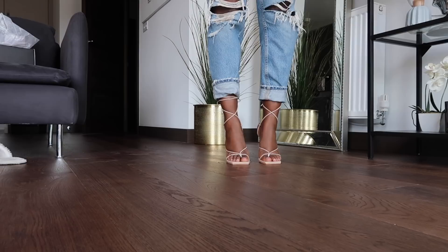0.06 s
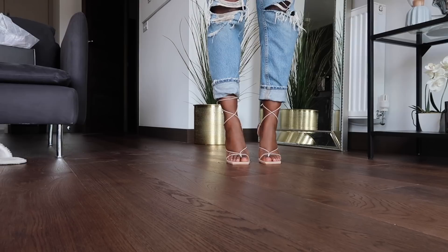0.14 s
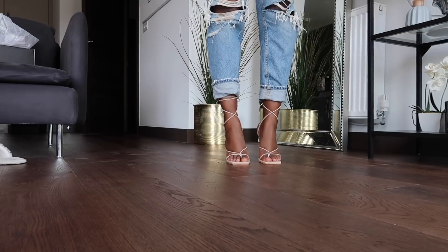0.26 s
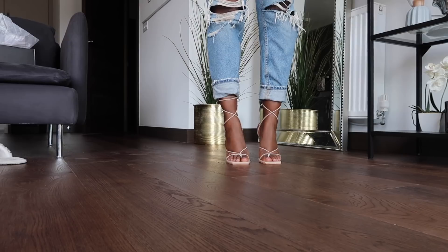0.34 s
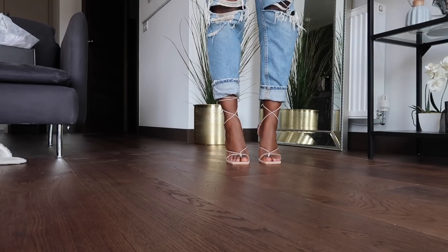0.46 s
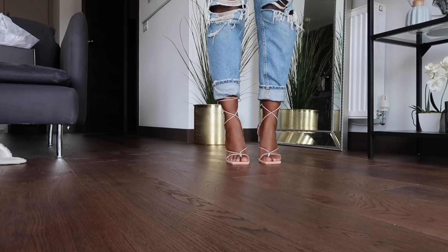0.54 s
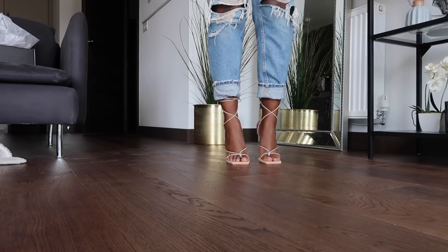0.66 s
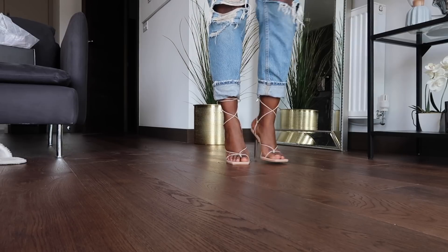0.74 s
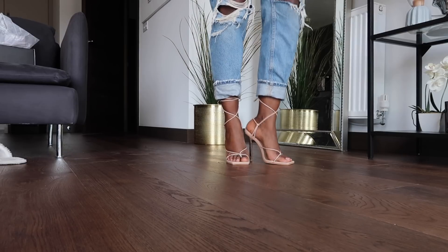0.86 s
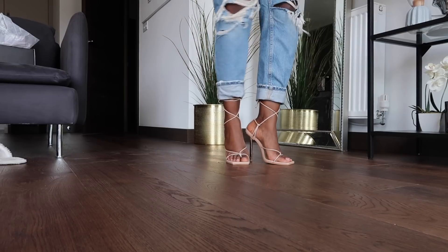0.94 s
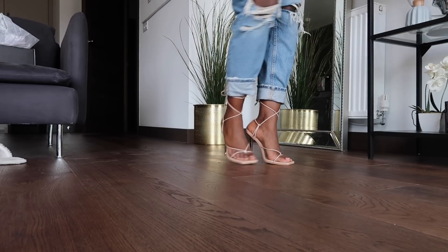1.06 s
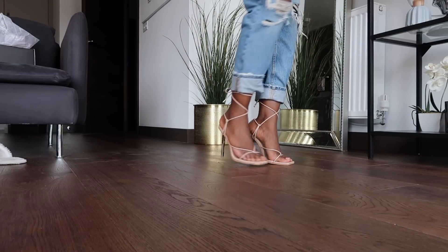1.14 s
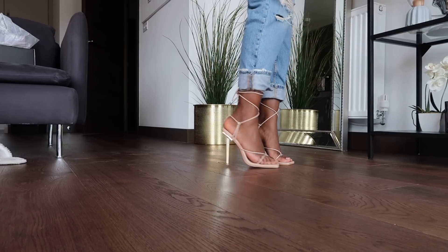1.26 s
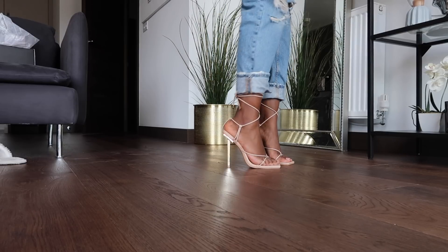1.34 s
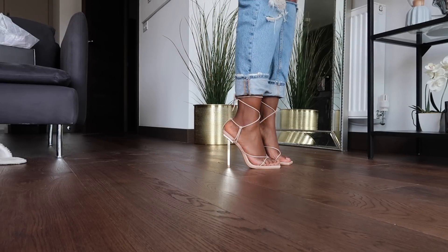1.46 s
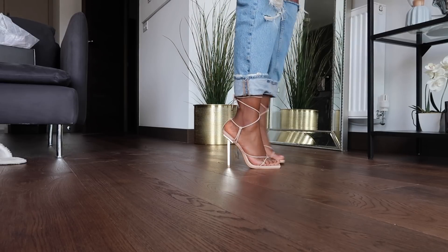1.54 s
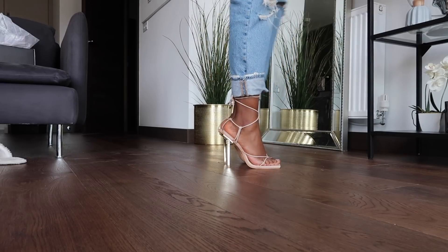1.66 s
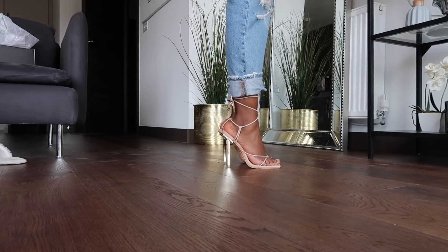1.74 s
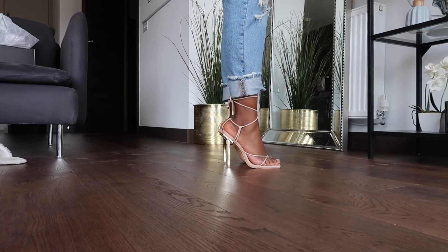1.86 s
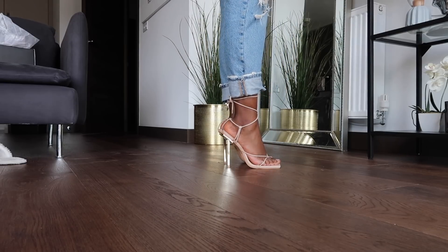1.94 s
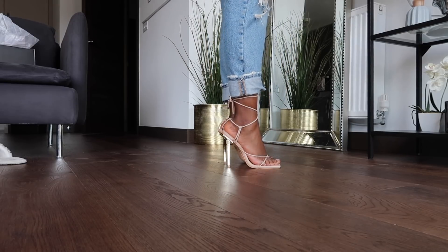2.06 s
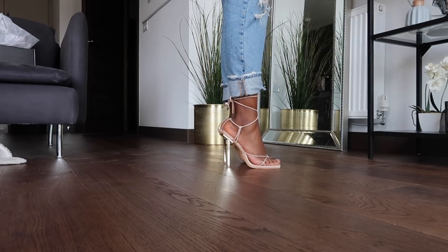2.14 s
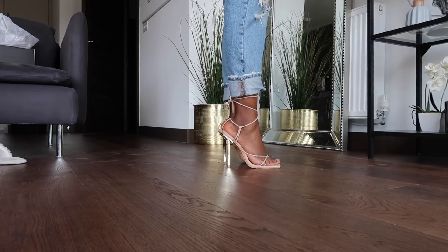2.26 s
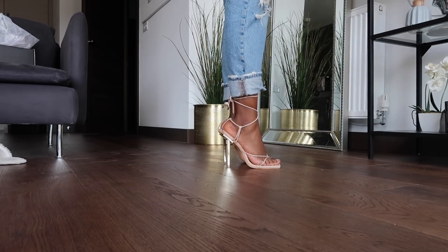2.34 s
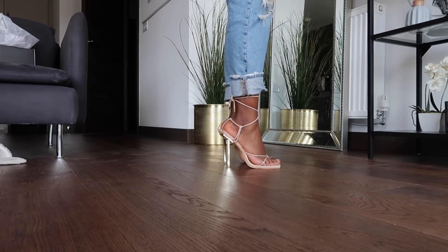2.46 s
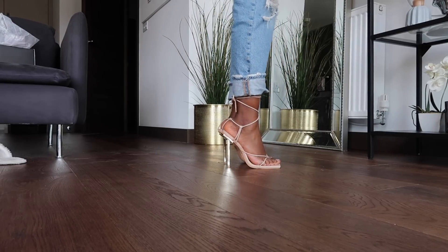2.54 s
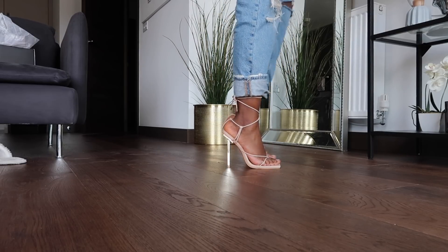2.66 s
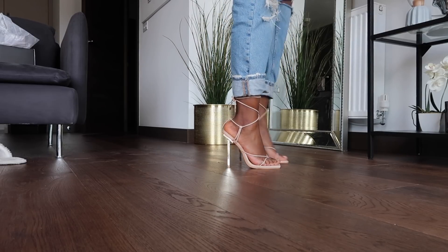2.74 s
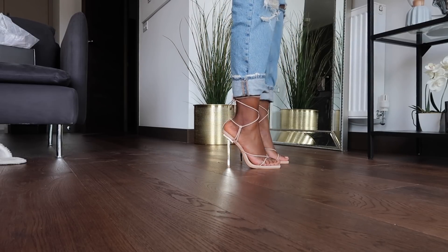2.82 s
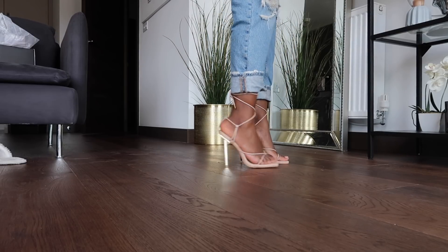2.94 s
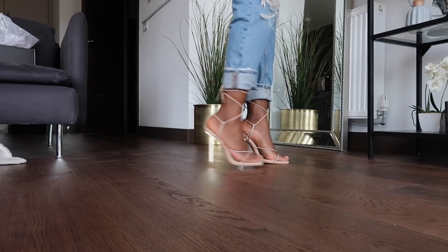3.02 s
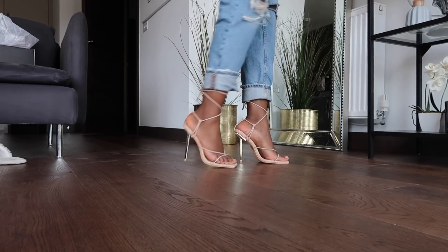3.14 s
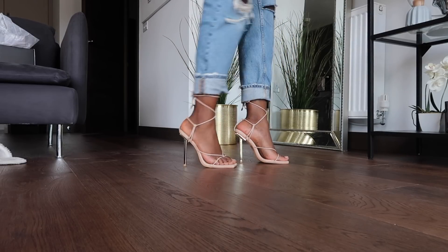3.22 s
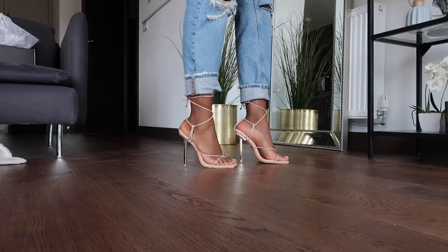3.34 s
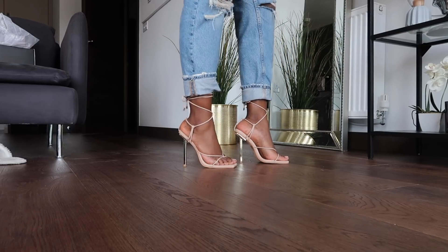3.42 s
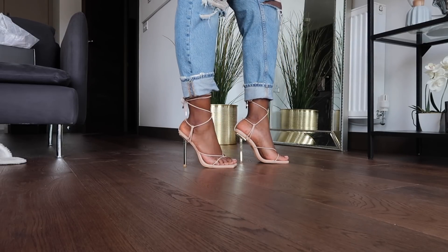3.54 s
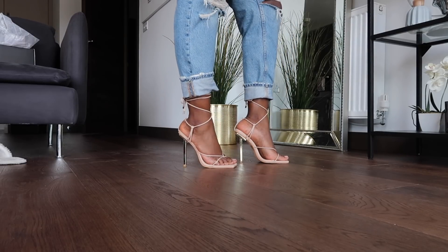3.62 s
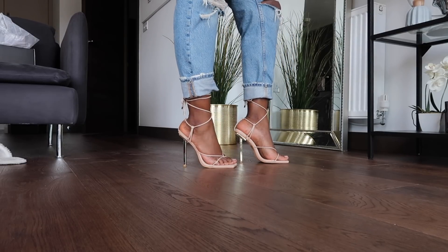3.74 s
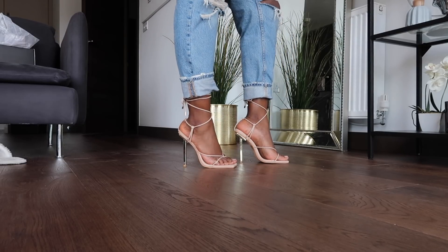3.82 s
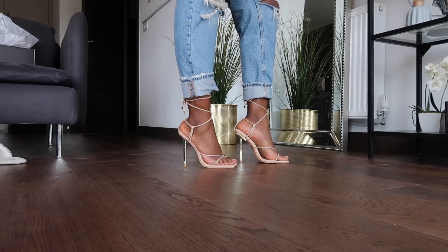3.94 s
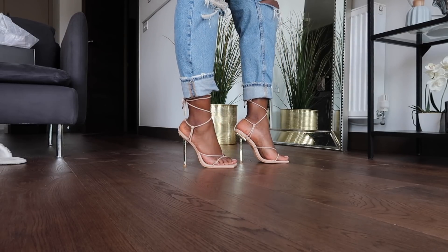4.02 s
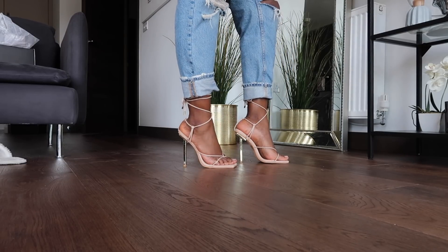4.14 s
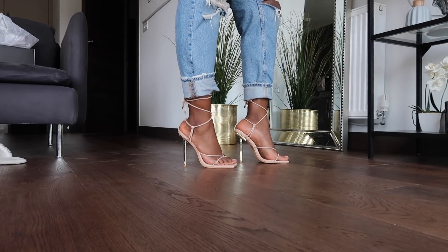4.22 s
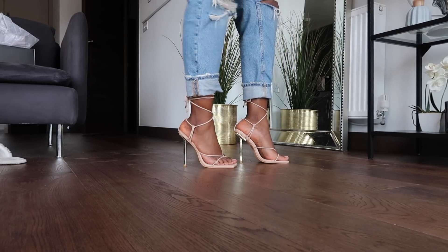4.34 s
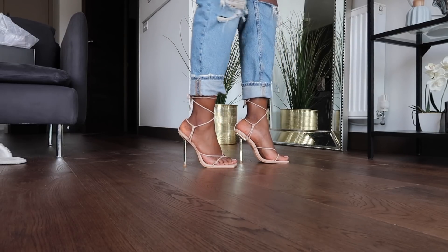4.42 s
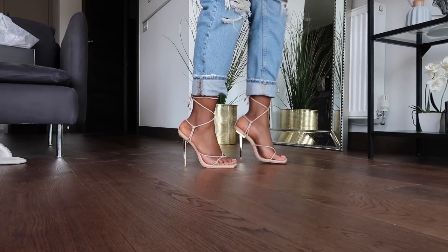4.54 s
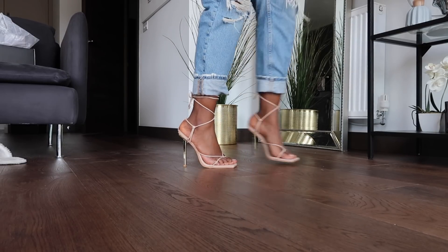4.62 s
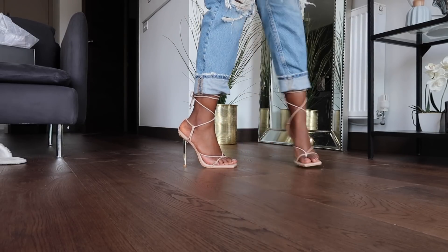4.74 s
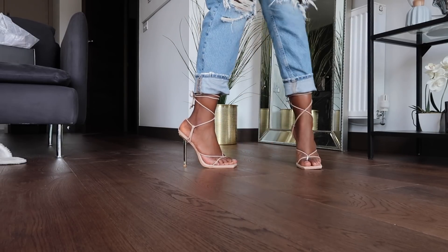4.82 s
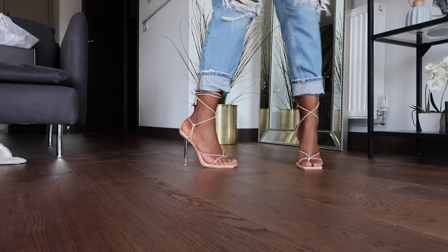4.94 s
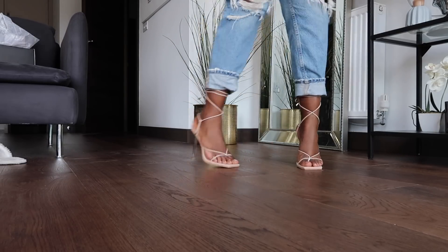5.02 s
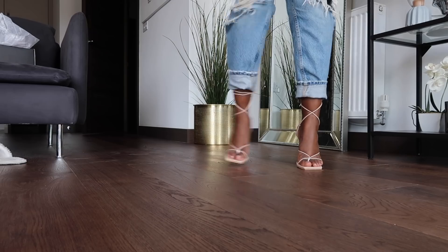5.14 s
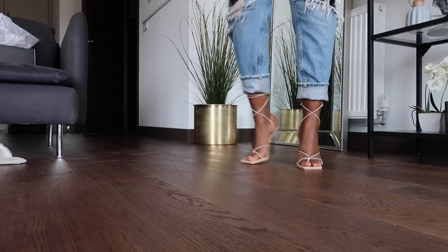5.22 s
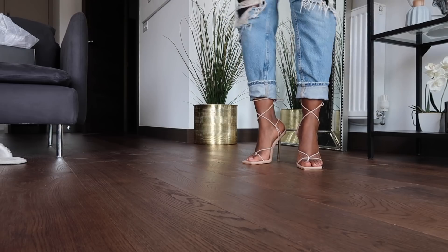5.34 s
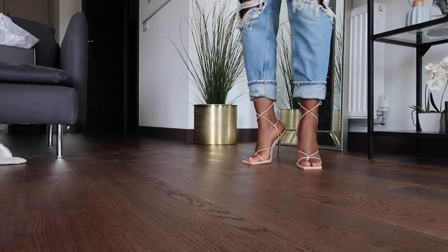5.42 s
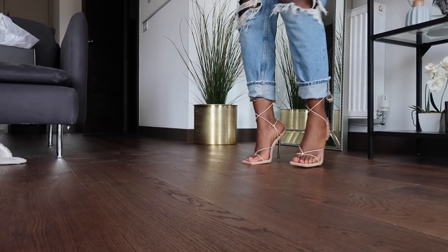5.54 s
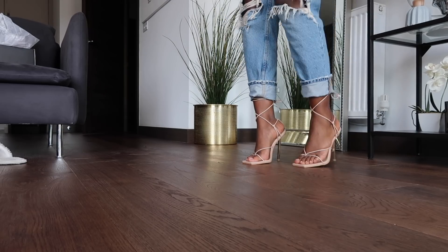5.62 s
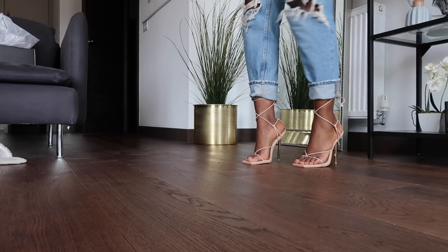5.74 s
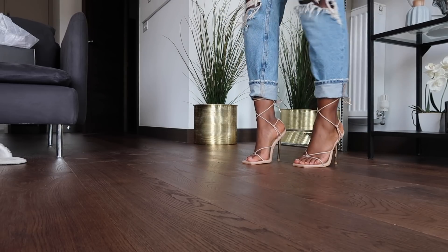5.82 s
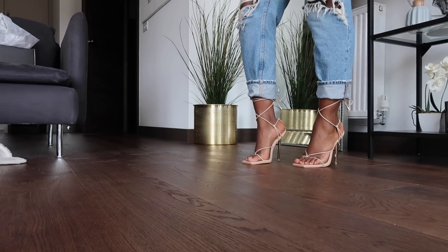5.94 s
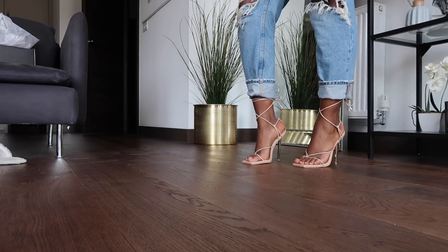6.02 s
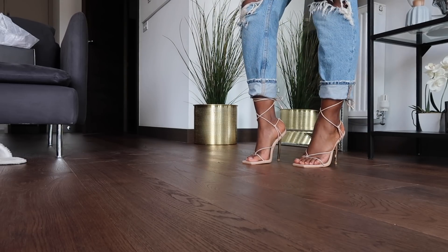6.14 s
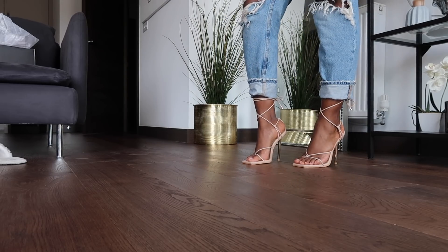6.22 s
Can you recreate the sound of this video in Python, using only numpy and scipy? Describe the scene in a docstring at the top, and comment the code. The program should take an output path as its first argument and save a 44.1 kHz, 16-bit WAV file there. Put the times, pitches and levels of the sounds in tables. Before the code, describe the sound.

Someone in thin-heeled sandals shifts and steps on a wooden floor indoors. A faint strap squeak leads to a run of crisp clacks and knocks, then a small buckle creak. After a pause come more steps, another pause, then a final group with gritty sole scuffs and a strong last knock. The stereo microphone is a few metres away, with a lively short room echo and quiet hiss.

```python
"""Footsteps in thin-heeled sandals

Someone shifts and steps on a wooden floor in a furnished room, a few metres from two microphone openings.
Heel tips and soles strike the boards as dispersed pulses that excite modes; heel shafts ping as damped
sines; soles scuff and straps squeak as random slips through resonators; a buckle creaks as ringing modes.
Echoes and decaying random taps form the room, over shaped hiss, a narrow-band hum and a high beating whine."""
import sys
import numpy as np
from scipy import signal
from scipy.fft import rfft, irfft
from scipy.io import wavfile
from scipy.ndimage import uniform_filter1d

SR = 44100
rng = np.random.default_rng(int(sys.argv[2]) if len(sys.argv) > 2 else 0)


def boost_factor(decibels):
    """Convert a level in decibels to a linear amplitude factor."""
    exponent = np.asarray(decibels, float) / 20
    return 10 ** exponent


def put_to_file(sound):
    """Save the sound as 16-bit audio at rate SR, in the file named by the first command-line argument."""
    columns = np.atleast_2d(sound).T  # one column per channel
    safe = np.clip(columns, -1, 1)
    whole_steps = np.round(safe * 32767)
    wavfile.write(sys.argv[1], SR, whole_steps.astype(np.int16))


N = 276507  # length in samples


def read(points, hz):
    """Interpolation on a logarithmic frequency axis of a table of (Hz, value)."""
    f, value = np.transpose(points)
    return np.interp(np.log(hz + 1), np.log(f + 1), value)


def evened(x):
    """Normalisation of signal power: scales to rms 1."""
    return x / np.sqrt(np.mean(x ** 2) + 1e-20)


def add(mix, s, sound):
    """Linear superposition: mixes a sound in at time s."""
    part = mix[round(s * SR):][:len(sound)]
    part += sound[:len(part)]


def resonate(x, hz, width):
    """Resonance by heterodyning: shifts the curve hz to zero, smooths, and shifts back, with gain 1."""
    turn = np.exp(2j * np.pi * np.cumsum(hz * np.ones(len(x))) / SR)
    r = np.exp(-np.pi * width / SR)
    return 2 * (turn * signal.lfilter([1 - r], [1, -r], x / turn)).real


def band(x, lo_hz, hi_hz):
    """Band-pass filtering by a Butterworth response."""
    sos = signal.butter(2, [lo_hz, min(hi_hz, SR / 2.2)], "band", fs=SR, output="sos")
    return signal.sosfilt(sos, x)


# The hiss swells around the steps and sinks after them.
# Each row: start of the rise in seconds, start of the fall in seconds, full lift in dB.
HISS_SWELLS = [(-.9, 0, 3), (.55, 1.95, 9), (2.7, 3.7, 9), (4.3, 5.95, 12)]
SWELL_RISE_S, SWELL_FALL_S = .8, .5


def swell_db(t):
    """Level modulation: the hiss swells around the steps and sinks after them."""
    lift_db = 0
    for start, end, db in HISS_SWELLS:
        rise, fall = (t - start) / SWELL_RISE_S, 1 - (t - end) / SWELL_FALL_S
        lift_db = lift_db + db * np.clip(np.minimum(rise, fall), 0, 1)
    return lift_db


# Spectrum of the hiss ahead of its bass cuts. Each row: frequency in Hz, relative level in dB.
HISS_SPECTRUM = [(24, -57), (40, -28), (69, -12), (109, -8), (172, -1.5), (213, -12.5), (297, -5),
                 (335, -19.5), (377, -10), (637, -24), (1050, -22.5), (2430, -27.5), (12000, -51),
                 (15600, -83.5), (22000, -120)]
# Stereo spread of the hiss. Each row: frequency in Hz, side minus mid in dB.
HISS_SIDE = [(60, -11.5), (130, -24), (290, -7), (640, -2), (1410, -4.5), (3100, -2.5), (6820, 0.5),
             (15000, -2)]
HISS_DB, PATCH_DB = -66, .43  # overall level; rms drift of the patches


def hiss():
    """Random noise of shaped spectrum: mid and side, with drifting patches and the swells."""
    frames, hz = N // 256 + 5, np.fft.rfftfreq(1024, 1 / SR)
    a, b, c, d, patches = rng.standard_normal((frames, 513, 5)).T
    patches = evened(uniform_filter1d(uniform_filter1d(patches, 10, 0), 14, 1))
    lift_db = swell_db(np.arange(frames) * 256 / SR)
    share = np.clip(np.log(hz / 200 + 1) / 1.6, 0, 1)[:, None]  # the swell lifts the bass least
    shape = (boost_factor(read(HISS_SPECTRUM, hz)) * np.minimum(hz / 90, 1) ** 3)[:, None]
    side = (c + 1j * d) * boost_factor(read(HISS_SIDE, hz))[:, None]
    z = np.array([a + 1j * b, side]) * shape
    steady = np.std(signal.istft(z[0], nperseg=1024, noverlap=768)[1])
    moving = z * boost_factor(PATCH_DB * patches + share * lift_db)
    noise = signal.istft(moving, nperseg=1024, noverlap=768)[1][:, :N] / steady
    return boost_factor(HISS_DB) * band(noise, 41, 20000)  # a band-pass keeps the hiss free of the deepest bass


HUM_HZ, HUM_WIDTH_HZ, HUM_DB, HUM_SIDE_DB = 166, 28, -65.5, -26.5  # side level is relative to mid


def hum():
    """Narrow-band noise: two resonators in a row make a wavering house hum, mid and side."""
    tones = []
    for noise in rng.standard_normal((2, N)):
        once = resonate(noise, HUM_HZ, HUM_WIDTH_HZ)
        tones.append(evened(resonate(once, HUM_HZ, HUM_WIDTH_HZ)))
    return boost_factor([[HUM_DB], [HUM_DB + HUM_SIDE_DB]]) * tones


# Two close high tones. Each row: frequency in Hz, rms level in dB in the mid signal.
WHINE_TONES = [(13001, -100), (13028, -99)]
WHINE_SIDE_DB = .5  # relative to mid


def whine():
    """Beating: two sines close in frequency wax and wane together, mid and side."""
    t = np.arange(N) / SR
    pair = [sum(boost_factor(db) * np.sqrt(2) * np.sin(2 * np.pi * (f * t + rng.random())) for f, db in WHINE_TONES)
            for _ in "ms"]
    return boost_factor([[0], [WHINE_SIDE_DB]]) * pair


def air():
    """Mid-side stereophony: hiss, hum and whine add, then sum and difference give left and right."""
    mid, side = hiss() + hum() + whine()
    return np.array([mid + side, mid - side])


# Strap resonances under the scuff. Each row: frequency in Hz, width in Hz, gain in dB.
STRAP_MODES = [(1960, 83, 12.5), (2540, 440, 22.5), (3560, 1000, 7), (5700, 170, -19)]
SLIPS_PER_S, SLIP_SPREAD_DB, WHISTLE_WIDTH_HZ = 3400, 2.5, 190


def scuff(level_db, whistle_hz, whistle_share, low_db, bright_db):
    """Stick-slip friction: uneven slips drive strap resonances, a whistle, a low rub and a bright rasp."""
    n = len(level_db)
    chance, size, sign = rng.random(n), rng.exponential(1, n), rng.standard_normal(n)
    slips = (chance < SLIPS_PER_S / SR) * boost_factor(SLIP_SPREAD_DB * np.minimum(size, 4)) * sign
    slips += .15 * sign  # fine continuous friction
    body = sum(boost_factor(db) * resonate(slips, f, width) for f, width, db in STRAP_MODES)
    body += .23 * band(slips, 1900, 4500)
    whistle = resonate(resonate(slips, whistle_hz, WHISTLE_WIDTH_HZ), whistle_hz, WHISTLE_WIDTH_HZ)
    share = np.clip(whistle_share, 0, 1)
    low = evened(band(slips, 450, 1500))
    bright = evened(band(band(slips, 4600, 12500), 2600, 14500))
    sound = (1 - share) * evened(band(body, 1400, 4000)) + share * evened(whistle)
    sound += boost_factor(low_db) * low + boost_factor(bright_db) * bright
    return boost_factor(level_db) * sound * signal.windows.tukey(n, .15)


SCUFF_ROOM_DB = -6.5  # what squeaks and rubs send to the room
# A strap squeaks as weight shifts.
# Each row: start in seconds, length in seconds, level in dB, first frequency in Hz, last frequency in Hz.
SQUEAKS = [(.63, .26, -70, 2050, 2050), (.75, .06, -71, 3150, 3950), (.808, .045, -64, 2620, 2480)]
STUTTER_DB, STUTTER_S = 3, .012


def squeaks():
    """Friction-driven resonance: a stretching strap gives a broken, fuzzy whistle that can glide and dies."""
    sounds = []
    for s, length, db, first_hz, last_hz in SQUEAKS:
        u = np.arange(SR // 3) / SR / length  # 0 to 1 over the squeak
        stutter = evened(uniform_filter1d(rng.standard_normal(len(u)), round(STUTTER_S * SR)))
        level_db = db - 12 * (2 * u - 1) ** 4 + STUTTER_DB * stutter
        glide_hz = first_hz + (last_hz - first_hz) * np.minimum(u, 1)
        sound = scuff(level_db, glide_hz, whistle_share=.55, low_db=-13, bright_db=-24)
        sounds.append((s, sound, SCUFF_ROOM_DB))
    return sounds


def rung(db, modes, rise_s):
    """Modal decay: damped sines of (Hz, dB, T60 in s) with a soft start."""
    t = np.arange(SR // 2) / SR
    ring = sum(boost_factor(db + d - 60 * t / t60) * np.sin(2 * np.pi * f * t) for f, d, t60 in modes)
    return ring * (1 - np.exp(-t / rise_s))


# The board underfoot booms or knocks under the heavier blows.
# Each row: start in seconds, level in dB, central frequency in Hz, T60 of the upper mode in seconds.
BOOMS = [(0.982, -22, 418, 0.16), (1.45, -17.5, 266.2, 0.34), (1.786, -10.5, 632, 0.031),
         (2.878, -18, 308.5, 0.18), (2.878, -14.5, 473, 0.065), (3.346, -29, 333, 0.26),
         (3.35, -8, 570, 0.045), (4.625, -29, 446, 0.061), (4.903, -14, 295.3, 0.12), (4.91, -29, 160, .25),
         (4.92, -23, 363, 0.26), (5.425, -24.5, 238.5, 0.15), (5.425, -16, 620, 0.03),
         (5.826, -19, 285.3, 0.23), (5.828, -1, 622, 0.024)]


def booms():
    """Coupled modes: each boom is a split pair, the lower one weaker and more strongly damped."""
    sounds = []
    for s, db, f, t60 in BOOMS:
        modes = [(.96 * f, -8, .73 * t60), (1.03 * f, -4, t60)]
        sounds.append((s, rung(db, modes, rise_s=.77 / f), -6))
    return sounds


# What the boards and the heel ring with.
# Each row: nominal frequency in Hz, relative level in dB, T60 in seconds.
BOARD_MODES = [(160, -6, .3), (222, -4, .3), (290, -4, .25), (400, -6, .15), (480, -3, .2), (550, -5, .15),
               (620, -2, .2), (700, -5, .05), (870, -3, .06), (990, -4, .1), (1200, -4, .09),
               (1500, -6, .06), (2000, -6, .04), (2500, -3, .03), (3500, -6, .025), (4600, -9, .02)]
RING_DB, RING_SPREAD_DB = -8, 4.5


def board_ring(t):
    """Modal excitation: each spot on the floor wakes the modes unevenly and slightly detuned."""
    ring = 0
    for f, db, t60 in BOARD_MODES:
        unevenness, detuning = rng.standard_normal(2)
        level = boost_factor(db + RING_SPREAD_DB * unevenness - 60 * t / t60)
        tone = np.sin(2 * np.pi * f * (1 + .014 * detuning) * t)
        ring = ring + level * tone / np.sqrt(t60 * SR * 500 / f * 10)
    return boost_factor(RING_DB) * ring


# Bands of a blow: knock, rap, clack, tick, snap. Each row: lower edge in Hz, upper edge in Hz.
BLOW_BANDS = [(300, 800), (800, 1600), (1600, 3000), (3000, 4800), (4800, 8000)]
# Fall-off below the knock and above the snap. Each row: frequency in Hz, level over the nearest band in dB.
BLOW_ENDS = [(40, -57.5), (110, -26.5), (230, -7), (8500, -8), (11000, -14), (16000, -53)]
LEAD_S = .01  # silence before each blow
TICK_DB, TICK_PER_HARDNESS = 5, .48  # the tick at 3-4.8 kHz follows the hardness
SWEEP_S, AIR_SWEEP_S = .001652, .0009  # delays at 1 kHz through the boards and the air
BOARD_PATH_DB, AIR_LAG_S = -11, .0008


def blow(clack_db, knock_db, rap_db, snap_db):
    """Bending-wave dispersion: a short pulse travels treble first, then the boards ring on."""
    size = 16384
    hz, t = np.fft.rfftfreq(size, 1 / SR), np.arange(size) / SR
    tick_db = TICK_DB + TICK_PER_HARDNESS * snap_db
    levels = clack_db + np.array([knock_db, rap_db, 0, tick_db, snap_db])
    # a pulse spread over a band peaks in proportion to the band's width
    density = [(np.sqrt(lo * hi), db - 20 * np.log10(2 * (hi - lo) / SR))
               for (lo, hi), db in zip(BLOW_BANDS, levels)]
    ends = [(f, db + density[0 if f < 1000 else -1][1]) for f, db in BLOW_ENDS]
    slowness = np.sqrt(1000 / np.maximum(hz, 120))

    def delayed(delay_s):
        """Group delay: the phase is the running sum of the delay over frequency."""
        return np.exp(-2j * np.pi * np.cumsum(LEAD_S + delay_s) * SR / size)

    through_boards = boost_factor(BOARD_PATH_DB) * delayed(SWEEP_S * slowness)
    airborne = delayed(AIR_LAG_S + AIR_SWEEP_S * slowness)
    pulse = boost_factor(read(sorted(density + ends), hz)) * (through_boards + airborne)
    sound = irfft(pulse * (1 + rfft(board_ring(t))))
    return sound * np.hanning(2 * size)[size:] * np.minimum(t / LEAD_S, 1)


# Blows of heel tip or sole. Each row: time in seconds, clack at 1.6-3 kHz in dB, then in dB over the clack:
# weight as knock at 300-800 Hz, flatness of contact as rap at 800-1600 Hz, hardness as snap at 4.8-8 kHz.
BLOWS = [(0.9824, -15, -5, -2.5, -16), (1.0924, -28, -9, -16, -40), (1.4071, -12.5, -16, -1.5, -30),
         (1.4502, -13, -6.5, -3, -47), (1.7264, -22.5, -14.5, -6.5, -35), (1.7863, -27.5, 11, 16.5, -36),
         (2.6994, -63.5, 12, -19, -35), (2.8776, -23, 5.5, 4.5, -32), (2.8874, -21.5, 4, 3, -19),
         (3.0214, -19, -8.5, -4, -16), (3.2443, -25, -18.5, -6, -30), (3.3108, -50, 2, 2, -36),
         (3.3483, -28, 12, 13, -44), (4.595, -50, -20, -25, -50), (4.6071, -34, -8.5, -17.5, -58),
         (4.6261, -32, -10, -17, -56), (4.9025, -24, 8, -7, -52), (4.9218, -14, -8, -2.5, -20),
         (5.0734, -21, -11, -8, -56), (5.3686, -21.5, -15.5, -5, -27), (5.3962, -30, -6, -6, -27),
         (5.4244, -11.5, -3, -1.5, -48), (5.5593, -23, -8, 5.5, -40), (5.7548, -16, -14.5, -1.5, -25),
         (5.77, -24, -14, -11, -40), (5.8268, -20.5, 7.5, 10, -39)]
ROOM_DB, ROOM_DB_PER_KNOCK_DB = 7.5, .0837


def blows():
    """Impact excitation: each contact has its own spectrum, and dull blows feed the room more."""
    return [(s - LEAD_S, blow(clack, knock, rap, snap), ROOM_DB + ROOM_DB_PER_KNOCK_DB * knock)
            for s, clack, knock, rap, snap in BLOWS]


# A sole rubs the floor. Each row: loudest moment in seconds, time to fade by 20 dB in seconds, level in dB,
# low part in dB, bright part in dB.
SCUFFS = [(1.1, .07, -43, 2, -28), (1.166, .04, -50, 0, -18), (2.71, .2, -74, 0, -12),
          (3.312, .04, -55, -8, -22), (4.44, .25, -75, -4, -5), (4.627, .016, -43, 2, -46),
          (4.85, .2, -63, -20, -8), (5.058, .012, -45, 8, -40), (5.076, .016, -28, -1, -45),
          (5.588, .04, -36, 8, -20), (5.622, .022, -28, -8, -8), (5.645, .08, -33, -8, -14)]
SCUFF_RISE, RUB_HZ = 1.1, 2000  # rise time as a share of the fade; whistle frequency
WHISTLE_PER_DULL_DB = .021  # dull rubs whistle more


def rubs():
    """Sliding friction: the dragged sole's noise swells and fades exponentially."""
    t = np.arange(-SR // 8, SR // 8) / SR
    sounds = []
    for s, fade_s, db, low_db, bright_db in SCUFFS:
        level_db = db - 20 * np.maximum(t, -t / SCUFF_RISE) / fade_s
        sound = scuff(level_db, RUB_HZ, -WHISTLE_PER_DULL_DB * bright_db, low_db, bright_db)
        sounds.append((s + t[0], sound, SCUFF_ROOM_DB))
    return sounds


# The thin heel shaft pings when its tip lands.
# Each row: time of landing in seconds, level in dB, frequency of the lower mode in Hz.
PINGS = [(1.4072, -17, 1940), (1.7265, -28.5, 2243), (3.0215, -18, 2493), (3.2445, -28, 2540),
         (3.311, -36, 2400), (4.6064, -37.5, 1954), (4.6269, -23, 1860), (4.9217, -12, 2105),
         (5.3692, -24, 2570), (5.7548, -13, 2390)]
PING_T60, PING_ROOM_DB = .026, -2


def pings():
    """Free vibration of a bar: two inharmonic modes die quickly after the airborne lag."""
    sounds = []
    for s, db, f in PINGS:
        modes = [(f, -9, PING_T60), (1.55 * f, -17, .8 * PING_T60)]
        sounds.append((s + AIR_LAG_S, rung(db, modes, rise_s=.0003), PING_ROOM_DB))
    return sounds


# A strap slips on its buckle and rings. Each row: start in seconds, level in dB.
CREAKS = [(1.565, -44), (1.578, -45), (1.5926, -29), (1.606, -35), (1.6155, -30), (1.63, -38),
          (1.6485, -35), (1.668, -39)]
# Modes of the buckle. Each row: nominal frequency in Hz, nominal level in dB, nominal T60 in seconds.
BUCKLE_MODES = [(2350, -5, .015), (2750, 0, .022), (3420, -4, .016), (4100, -7, .008), (4900, -8, .008),
                (5380, -4, .013)]
CREAK_ROOM_DB, CREAK_GRIT_S = -9, .0014


def creaks():
    """Stick-slip excitation of modes: gritty slips ring the buckle, a little differently each time."""
    t = np.arange(600) / SR
    sounds = []
    for s, db in CREAKS:
        scatter = rng.standard_normal((len(BUCKLE_MODES), 3)).clip(-2, 2)
        modes = BUCKLE_MODES * (1 + [.015, .25, .2] * scatter)
        grit = (rng.random(len(t)) < .06) * np.exp(-t / CREAK_GRIT_S) + (t == 0)
        sound = signal.fftconvolve(rung(db, modes, rise_s=.00033), grit / np.linalg.norm(grit))
        sounds.append((s, sound, CREAK_ROOM_DB))
    return sounds


# The shoe shades the straight path in the treble. Each row: frequency in Hz, gain in dB.
SHOE_SHADE = [(2500, 0.5), (4500, 0), (8000, -9.5)]
# Nearby surfaces. Each row: delay in seconds, gain in dB.
ECHOES = [(.0012, -11), (.0058, -15.5), (0.009, -6.5), (0.0135, -19.5), (.021, -37)]


def straight_and_echoed(near):
    """Shadowing and specular reflection: the shaded straight sound plus its delayed copies."""
    near = irfft(rfft(near) * boost_factor(read(SHOE_SHADE, np.fft.rfftfreq(N, 1 / SR))), N)
    echoed = near.copy()
    for s, db in ECHOES:
        add(echoed, s, boost_factor(db) * near)
    return echoed


# Decay of the room ahead of its bend. Each row: frequency in Hz, T60 in seconds.
ROOM_T60 = [(100, 0.29), (200, .4), (400, 0.27), (800, .52), (1600, .48), (3200, 0.52), (6400, 0.39),
            (9000, 0.15), (13000, .11)]
# Colour of the room. Each row: frequency in Hz, relative level in dB.
ROOM_COLOUR = [(100, 18), (300, -0.5), (700, 4), (1500, -2.5), (3000, -5), (6000, 11.5), (12000, 1.5)]
# Likeness of the left and right tails. Each row: frequency in Hz, likeness from 0 to 1.
ROOM_LIKENESS = [(100, .985), (300, .98), (600, .99), (1500, .97), (3000, .88), (5000, .6), (9000, .75)]
PLACES = 6  # tails taken in turn
HALL_DB, HALL_T60 = -38, 3.1  # the slower ring of the rooms beyond
BEND_DB, BEND_S = 10, .2  # the tail falls away faster as it fades


def rooms():
    """Diffuse reverberation: dense random taps die band by band, one pair of tails per place."""
    taps = rng.choice([-1., 1.], (PLACES, 2, SR)) * (rng.random((PLACES, 2, SR)) < .08)
    taps[..., :130] = 0
    hz, t, z = signal.stft(taps, SR, nperseg=256)
    room_db = -60 * t / read(ROOM_T60, hz)[:, None] - BEND_DB * (t / BEND_S) ** 3
    fall = boost_factor(room_db) + boost_factor(HALL_DB - 60 * t / HALL_T60)
    same = np.clip(read(ROOM_LIKENESS, hz), 0, 1)[:, None]
    apart = np.sqrt((1 - same) / (1 + same))
    z = np.stack([z[:, 0] + apart * z[:, 1], z[:, 0] - apart * z[:, 1]], 1) * fall
    z /= np.sqrt(np.sum(abs(z) ** 2, -1).mean((0, 1)))[:, None]  # equal energy in every band
    coloured = z * boost_factor(read(ROOM_COLOUR, hz))[:, None]
    tails = signal.istft(coloured, SR, nperseg=256)[1][..., :SR]
    tails[..., :100] = 0
    return tails / np.sqrt(np.sum(tails ** 2, -1).mean())


def feet():
    """Superposition of paths: every foot sound goes straight, off nearby surfaces and through the room."""
    near, wet = np.zeros(N), np.zeros((PLACES, N))
    sounds = blows() + booms() + pings() + creaks() + rubs() + squeaks()
    for k, (s, sound, room_db) in enumerate(sounds):
        add(near, s, sound)
        add(wet[k % PLACES], s, boost_factor(room_db) * sound)
    reverberant = signal.fftconvolve(wet[:, None], rooms(), axes=2)[..., :N].sum(0)
    return straight_and_echoed(near) + reverberant


# Phase between the openings. Each row: frequency in Hz, lead of the left in radians.
PORT_PHASE = [(1000, -.06), (2900, -.22), (4200, -.7), (6000, -1.2), (7700, -2.2), (9000, -2.5),
              (15000, -2.6)]
# Balance between the openings. Each row: frequency in Hz, left minus right in dB.
PORT_BALANCE = [(60, 0.5), (240, 0.5), (950, -1), (3770, -1.5), (15000, 1.5)]


def ports(x):
    """Interchannel phase: two close microphone openings, alike in the bass, nearly opposite in the treble."""
    hz = np.fft.rfftfreq(N, 1 / SR)
    half = np.exp(.5j * read(PORT_PHASE, hz)) * boost_factor(.5 * read(PORT_BALANCE, hz))
    return irfft(rfft(x) * np.array([half, 1 / half]), N)


def scene():
    """Superposition: feet at the microphone openings, over the air of the room."""
    return ports(band(feet(), 110, 19000)) + air()  # light steps move little deep bass


def low_pass(x):
    """Removes everything above the highest recorded frequency."""
    return signal.sosfilt(signal.butter(12, 15700, fs=SR, output="sos"), x)


def record(dry):
    """Signal chain: the finished mix of the scene goes through the last stage."""
    return low_pass(dry)


dry = scene()
out = record(dry)
put_to_file(out)
```